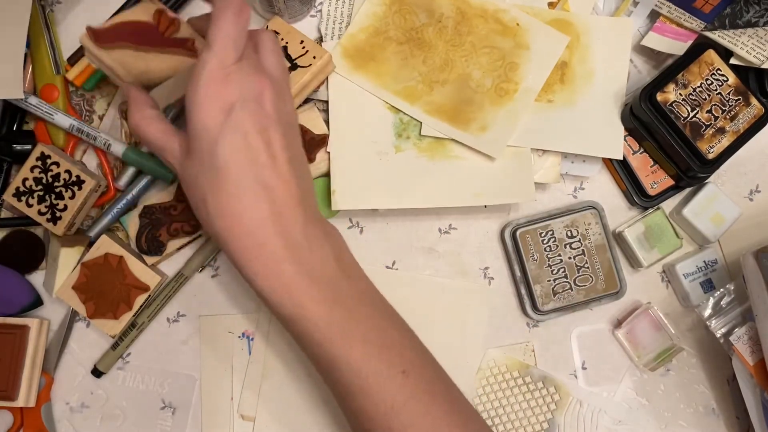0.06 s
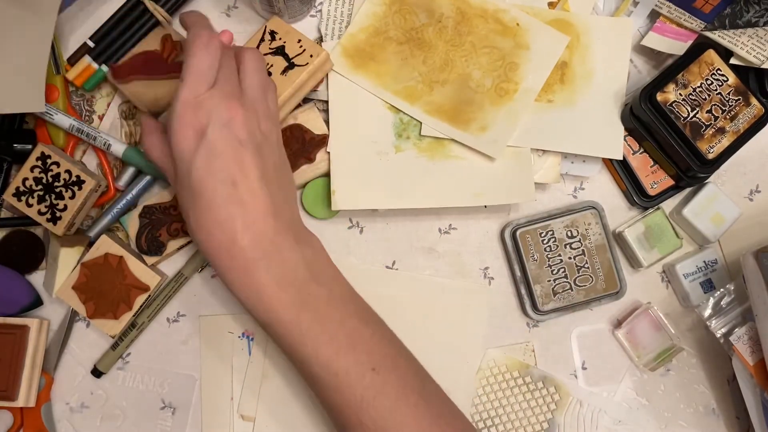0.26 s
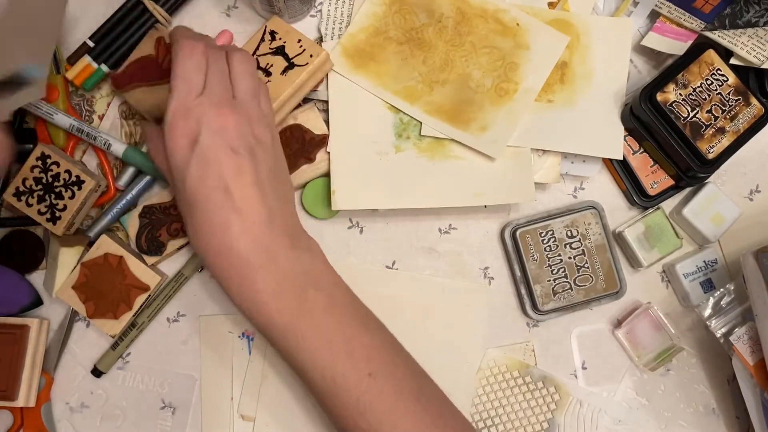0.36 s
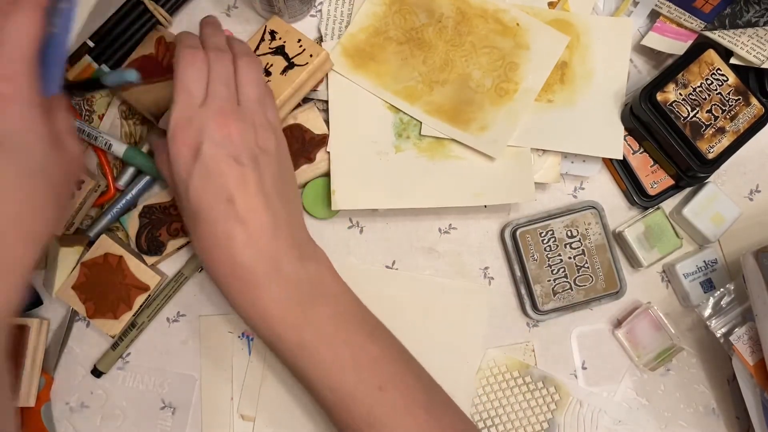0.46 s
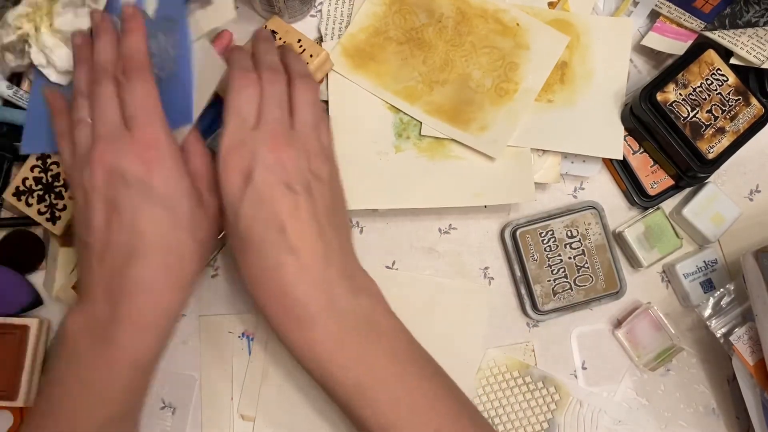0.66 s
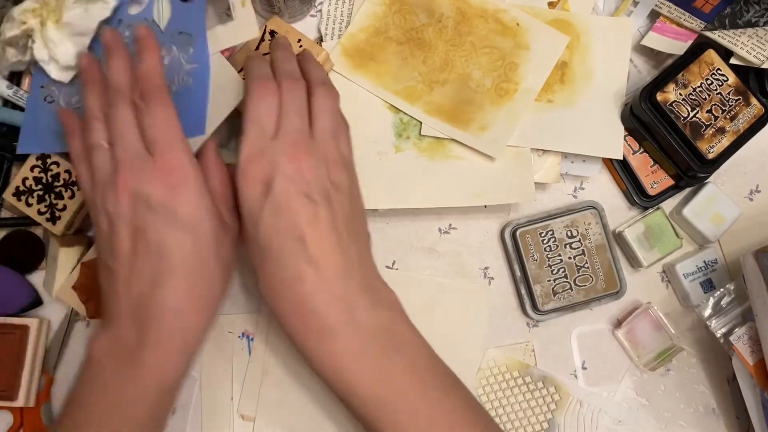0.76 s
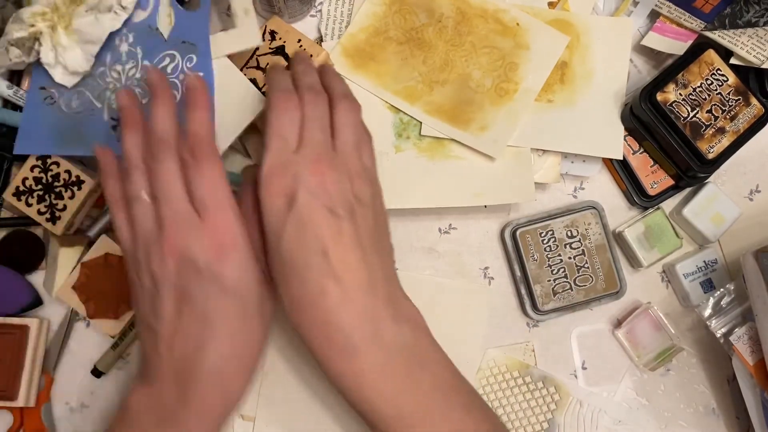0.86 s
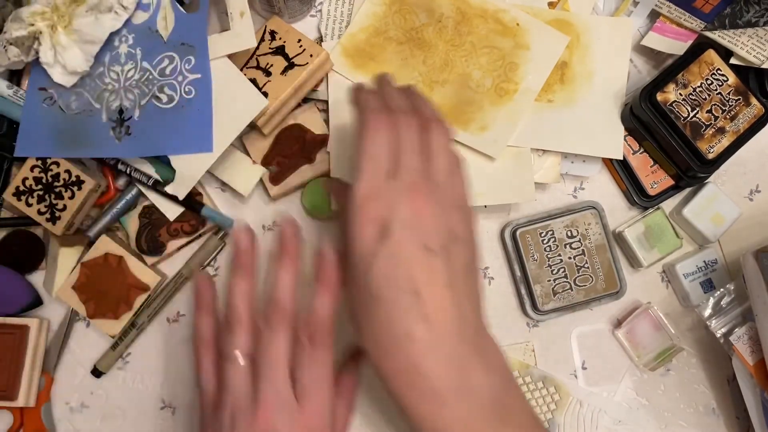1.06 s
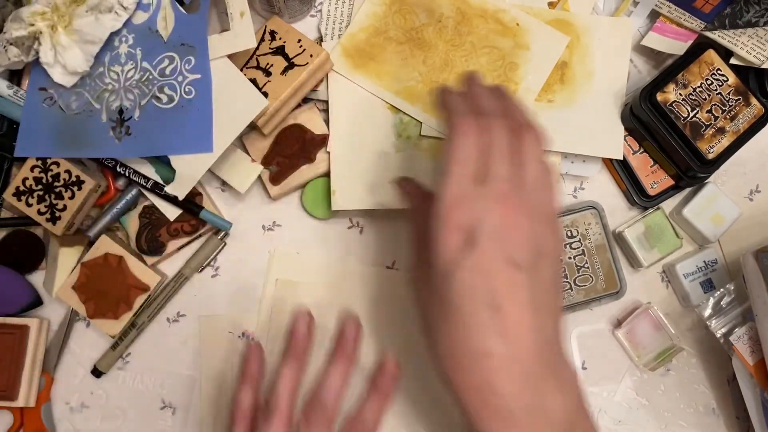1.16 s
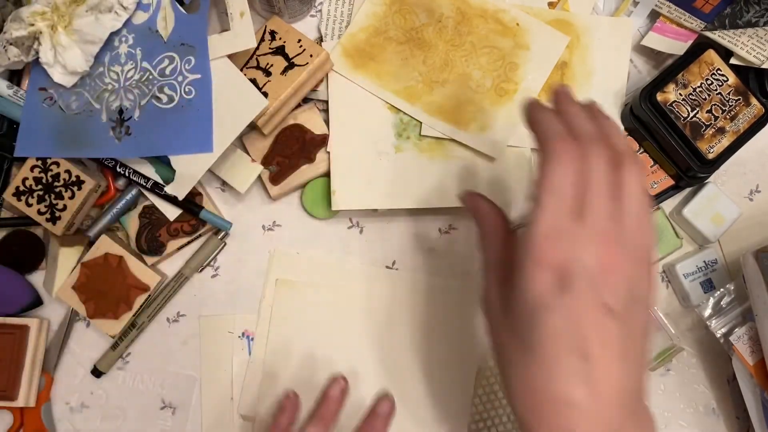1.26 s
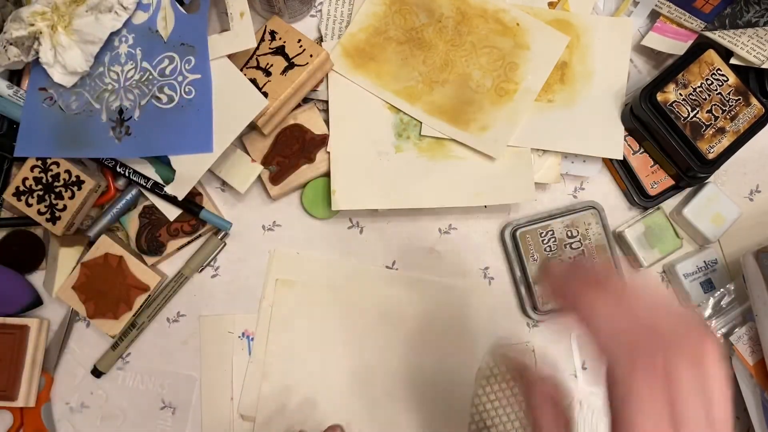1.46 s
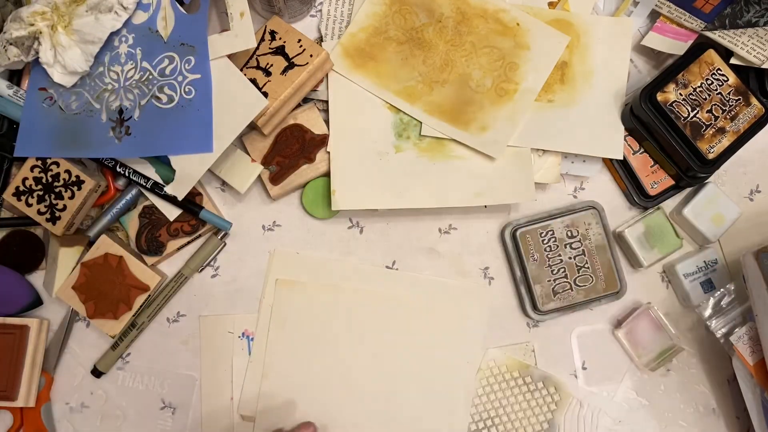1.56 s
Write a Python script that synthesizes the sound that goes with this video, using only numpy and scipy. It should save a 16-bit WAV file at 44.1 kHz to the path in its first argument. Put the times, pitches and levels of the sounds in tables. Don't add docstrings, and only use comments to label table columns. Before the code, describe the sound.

Light wooden knocks, clicks and short skids of craft blocks being shifted, with paper rustling, then quiet.

```python
import sys
import numpy as np
from scipy import signal
from scipy.fft import rfft, irfft
from scipy.io import wavfile
from scipy.ndimage import uniform_filter1d

SR = 44100
rng = np.random.default_rng(int(sys.argv[2]) if len(sys.argv) > 2 else 0)


def nominal_scale(level):
    x = np.asarray(level, float) / 20
    return 10 ** x


def wrap_up_sound(samples):
    columns = np.atleast_2d(samples).T
    tamed = np.clip(columns, -1, 1)
    steps = np.round(tamed * 32767).astype(np.int16)
    wavfile.write(sys.argv[1], SR, steps)


N = 70560

# (frequency [Hz], density [dB per Hz])
ROOM_TONE = [(28, -11), (60, 0.5), (230, -8.5), (480, -14), (650, -24), (2000, -20.5), (3300, -32),
             (15000, -34)]
# (frequency [Hz], likeness [0-1])
ROOM_LIKENESS = [(100, 0.97), (300, 0.89), (520, 0.39), (900, 0.027), (2000, 0.88), (3000, 0.55),
                 (5000, 0.89), (8000, 0.58)]
# (frequency [Hz], likeness [0-1])
NEAR_LIKENESS = [(300, 1), (480, 0.89), (750, 0.75), (2000, 1), (3000, 0.19), (5000, 0.92), (8000, 0.99)]
ROOM_DB = -63

# (time [s], level [dB], low drag weight [dB])
HAND_EFFORT = [(0, -73.5, -4), (0.077, -74, -2), (.14, -60.5, 1), (.2, -65.5, -2), (.25, -81, 1),
               (.3, -60, -4), (0.359, -62, 1), (0.401, -46.5, -36), (.42, -55.5, -4.5), (.495, -55.5, -6.5),
               (.515, -51.5, -0.5), (.62, -51.5, 0.5), (.72, -49.5, -6.5), (.75, -58.5, 6.5),
               (0.8, -51.5, 0.5), (0.838, -60, -8), (1.0, -72, -1.5), (1.25, -95, 21)]
# (frequency [Hz], density [dB per Hz])
RUB_TONE = [(150, -12.5), (520, -3.5), (1700, -5), (2400, -8.5), (3400, -10), (6500, -13.5), (10500, -11),
            (16000, -22.5)]
RUB_DB, DRAG_HZ = 3.5, 2130
GRAINS_PER_S, GRAIN_DB, GRAIN_SPREAD_DB = 450, 0.5, 3.5

# (time [s], level [dB], ring [Hz], t60 [s])
SNAPS = [(.032, -56, 207, 0.043), (.1425, -48.5, 1296, 0.034), (.143, -49, 5240, 0.023),
         (.184, -55, 4300, .01), (.2525, -51, 950, 0.015), (.3115, -46, 1250, 0.01),
         (.330, -46.5, 693, .02), (.3315, -49.5, 1570, 0.035), (.4295, -46, 1520, 0.016),
         (.4895, -42.5, 4050, 0.017), (.4898, -39, 1710, .013), (.512, -45, 694, 0.011),
         (.5165, -43.5, 1510, 0.011), (.5192, -37.5, 512, 0.022), (.523, -45, 900, 0.012),
         (.537, -44.5, 900, .02), (.547, -50, 2140, 0.033), (.555, -46.5, 646, 0.018),
         (.562, -48, 1200, 0.012), (.581, -45, 600, .03), (.589, -43, 800, 0.017), (.611, -48, 1410, .015),
         (.642, -39, 1700, 0.018), (.6555, -34.5, 1650, 0.011), (.673, -41, 700, 0.018),
         (.6975, -37.5, 1400, 0.015), (.7457, -41, 617, 0.02), (.757, -46, 1300, .02),
         (.7645, -45, 5640, .015), (.7775, -43.5, 454, 0.028), (.7888, -31, 1750, .016),
         (.7895, -38.5, 3130, .01), (.796, -48, 5130, 0.011), (.8089, -33, 1215, .01),
         (.8145, -41.5, 5070, .01), (.8212, -44, 3000, .008), (.838, -50, 3120, .012),
         (.8616, -44, 5040, .015), (.993, -53, 226, .05), (1.008, -50.5, 192, .07), (.2985, -38, 700, .03),
         (.229, -36, 1150, .025), (.6245, -35, 800, .02), (.436, -42, 310, .04), (.3925, -46, 2500, 0.013),
         (1.082, -55.5, 2980, 0.014), (1.0825, -53, 1620, 0.013), (.888, -52.5, 1190, 0.017),
         (.83, -53, 523, .04)]
SNAP_RISE_TURNS, SNAP_SAG = 0.31, 0.094

# (time [s], level [dB], pitch [Hz], t60 [s], rise [s])
THUMPS = [(0.099, -59, 249, 0.12, 0.005), (.229, -31.5, 318, 0.043, 0.0044),
          (.233, -29, 170, 0.032, 0.0026), (.254, -30, 133, 0.059, 0.0078),
          (.279, -28.5, 193, 0.047, 0.0029), (.298, -26, 246, 0.068, 0.0039),
          (.3, -18.5, 182, 0.049, 0.0056), (0.331, -29, 193, 0.045, 0.0097),
          (0.341, -32.5, 198, 0.017, 0.0047), (.402, -46, 217, 0.044, 0.003),
          (.430, -33, 181, 0.09, 0.0073), (.433, -37.5, 256, 0.041, 0.0049),
          (0.52, -48, 250, 0.035, 0.0037), (0.583, -43, 150, 0.063, 0.0067),
          (0.6283, -23.5, 175, 0.036, 0.0015), (.652, -48, 248, 0.047, 0.0022),
          (0.769, -34, 154, 0.029, 0.0078), (.235, -39.5, 101.5, 0.13, 0.0085),
          (.301, -37, 104, 0.07, 0.0019), (0.433, -43, 90.7, 0.071, 0.0027),
          (0.6252, -30, 495, 0.013, 0.00079), (0.629, -43.5, 105, 0.11, 0.0064),
          (.308, -32, 320, 0.055, 0.0045)]
# (frequency [Hz], level [dB], t60 [s])
BLOCK_MODES = [(690, -0.5, 0.024), (900, -25, 0.047), (1147, -19.5, 0.031), (398.3, 5, 0.042)]
BLOCK_DB = -22
SETTLE, SETTLE_S = 0.57, 0.0023

# (time [s], level [dB], ring [Hz], length [s], treble share
# [dB])
TICKS = [(0.11, -56.5, 1350, 0.035, 3), (0.139, -45.5, 1200, 0.0091, 2),
         (0.2281, -31.5, 1190, 0.0049, -10.5), (0.231, -33, 690, 0.011, -43),
         (.266, -38.5, 1290, 0.0044, 0.5), (0.276, -41, 1010, 0.0047, -3), (0.297, -34.5, 690, 0.0062, -26),
         (0.331, -48, 1480, 0.012, -10), (0.387, -50, 2500, 0.028, 3), (0.4307, -36.5, 2480, 0.003, 2),
         (0.4895, -45.5, 1900, 0.0068, 8), (.512, -41, 900, 0.023, 2.5), (0.586, -43.5, 600, 0.0063, -10),
         (0.617, -34.5, 900, 0.0068, -11), (0.618, -39.5, 4100, 0.016, 3), (0.654, -40, 1470, 0.011, -3),
         (0.761, -37, 1390, 0.012, -3.5),
    (0.7876, -37.5, 1700, 0.0056, -0.5),
    (0.8084, -36.5, 1180, 0.0052, -2),
    (0.811, -60, 1970, 0.0038, -9),
    (0.836, -58, 3000, 0.0054, -8),
    (0.862, -53, 5100, 0.0049, 3),
    (0.888, -55, 4860, 0.0054, 1),
    (0.961, -58, 1790, 0.0081, -16),
    (1.002, -63.5, 1590, 0.034, -15),
    (1.081, -56, 900, 0.0051, 5.5),
]
# (frequency [Hz], density [dB per Hz])
CRACK_TONE = [(200, -16), (1000, 2), (3000, 6), (6000, 3.5), (11000, -8), (16000, -11)]
TICK_RISE, TICK_Q, TICK_TAIL_S, TICK_TAIL_DB = 0.19, 1.95, 0.029, -20
SPIKY = 1.37

# (time [s], level [dB], pitch [Hz], length [s])
SKIDS = [
    (.6192, -31.5, 1833, 0.0061),
    (.6243, -22, 1320, 0.002),
    (.6885, -34.5, 1420, 0.0088),
    (.7455, -43, 820, 0.0051),
    (.720, -50, 5100, 0.0065),
    (.446, -45.5, 4500, 0.0073),
    (.152, -55, 3850, 0.021),
    (.2284, -39, 2970, 0.004),
]
SKID_WOBBLE = 0.17

ECHO_DB, ECHO_T60_S, ECHO_HZ = -14, 0.21, 3500

# (frequency [Hz], left lead [rad])
PORT_LEAD = [(100, 0), (1900, .1), (3000, 1.2), (5000, .1), (7400, 3.14), (10600, 6.28), (13600, 9.42),
             (16000, 12.5)]
# (frequency [Hz], left minus right [dB])
PORT_PAN = [(100, .1), (400, .6), (800, 2.2), (1600, .2), (3800, -1.5), (6000, 0)]
# (from [Hz], to [Hz])
SUM_GAPS = [(6550, 8150), (12500, 14650)]
# (from [Hz], to [Hz])
DIFFERENCE_GAPS = [(1750, 1950), (5000, 5500), (9700, 11650), (15400, 17000)]
# (from [s], to [s])
BUSY = [(.124, .143), (.227, .234), (.264, .279), (.374, .401), (.428, .433), (.748, .818)]
GAP_DB, RAGGED_HZ = -40, 170
AIR_HZ, AIR_DB, AIR_STEP_HZ, AIR_STEP_DB = 14200, -85, 15150, 9
EDGE_HZ, LOW_CUT_HZ = 15850, 40


def evened(x):
    return x / np.sqrt(np.mean(x ** 2) + 1e-20)


def read(points, hz):
    f, value = np.transpose(points)
    return np.interp(np.log(hz + 1), np.log(f + 1), value)


def add(mix, s, sound):
    part = mix[round(s * SR):][:len(sound)]
    part += sound[:len(part)]


def colour(x, gain):
    hz = np.fft.rfftfreq(x.shape[-1], 1 / SR)
    return irfft(rfft(x) * gain(hz), x.shape[-1])


def hiss(tone, patchy_db):
    a, b, patches = rng.standard_normal((N // 128 + 5, 257, 3)).T
    patches = uniform_filter1d(patches, size=8, axis=0)
    patches = evened(uniform_filter1d(patches, size=10, axis=1))
    grid = (a + 1j * b) * nominal_scale(patchy_db * patches)
    x = signal.istft(grid, nperseg=512, noverlap=384)[1][:N]
    return evened(colour(x, lambda f: nominal_scale(read(tone, f))))


def pair(x, other, likeness):
    def shared(f):
        return np.sqrt((1 + np.clip(read(likeness, f), 0, 1)) / 2)

    unlike = colour(other, lambda f: np.sqrt(1 - shared(f) ** 2 + 1e-12))
    return colour(x, shared) + np.array([unlike, -unlike])


def smear(x, t60, first):
    t = np.arange(round(0.4 * SR)) / SR
    tail = rng.standard_normal(len(t)) * nominal_scale(-60 * t / t60) * (t > first)
    return signal.fftconvolve(x, tail / np.linalg.norm(tail))[:N]


def room():
    left_and_right = pair(hiss(ROOM_TONE, patchy_db=1.2), hiss(ROOM_TONE, patchy_db=1.2), ROOM_LIKENESS)
    return nominal_scale(ROOM_DB) * left_and_right


def rustle():
    at, db, drag_db = np.transpose(HAND_EFFORT)
    t = np.arange(N) / SR
    size = nominal_scale(GRAIN_SPREAD_DB * np.minimum(rng.exponential(1, N), 4))
    size = size * (rng.random(N) < GRAINS_PER_S / SR)
    decay = np.exp(-np.arange(400) / SR / 0.004)
    catches = evened(signal.fftconvolve(size, decay)[:N])
    lift_off = np.clip((at[-1] - t) / 0.18, 0, 1)
    effort = lift_off * nominal_scale(RUB_DB + np.interp(t, at, db))
    shape = effort * evened(1 + nominal_scale(GRAIN_DB) * catches)
    both = pair(hiss(RUB_TONE, patchy_db=3.0), hiss(RUB_TONE, patchy_db=-0.5), NEAR_LIKENESS)
    drag = colour(both, lambda f: 1 / (1 + (f / DRAG_HZ) ** 6))
    return shape * (both - drag + nominal_scale(np.interp(t, at, drag_db)) * drag)


def snaps():
    out, t = np.zeros(N), np.arange(4096) / SR
    for s, db, hz, t60 in SNAPS:
        turns = hz * t * (1 - SNAP_SAG * np.minimum(t / t60, 1))
        ring = np.sin(2 * np.pi * turns) + 0.29 * np.sin(2 * np.pi * 1.25 * turns)
        rise = 1 - np.exp(-t * hz / SNAP_RISE_TURNS)
        add(out, s, nominal_scale(db - 60 * t / t60) * rise * ring)
    return out


def thumps():
    out, t = np.zeros(N), np.arange(round(0.25 * SR)) / SR
    for s, db, hz, t60, rise in THUMPS:
        turns = hz * (t + SETTLE * SETTLE_S * (1 - np.exp(-t / SETTLE_S)))
        swell = 1 - np.exp(-(t / rise) ** 2)
        top = swell * nominal_scale(-60 * t / t60) * np.sin(2 * np.pi * turns)
        f, mode_db, mode_t60 = np.transpose(BLOCK_MODES)[:, :, None]
        f = f * rng.uniform(0.883, 1.034, f.shape)
        modes = nominal_scale(BLOCK_DB + mode_db - 60 * t / mode_t60) * np.sin(2 * np.pi * f * t)
        add(out, s, nominal_scale(db + 5.0) * (top + modes.sum(0)))
    return out


def ticks():
    out, t = np.zeros(N), np.arange(4096) / SR
    for s, db, hz, length, treble_db in TICKS:
        push = rng.standard_normal((2, len(t)))
        u = t / length
        tail = nominal_scale(TICK_TAIL_DB) * np.exp(-t / TICK_TAIL_S)
        shape = np.minimum(u / TICK_RISE, 1) * (np.exp(-u ** 2 * 2) + tail)
        push = np.sign(push) * abs(push) ** SPIKY * shape
        b, a = signal.iirpeak(hz, TICK_Q, SR)
        ring = signal.lfilter(b, a, signal.lfilter(b, a, push[0]))
        crack = evened(colour(np.roll(push[1], 64), lambda f: nominal_scale(read(CRACK_TONE, f))))
        sound = evened(ring) + nominal_scale(treble_db) * np.roll(crack, -64)
        add(out, s, nominal_scale(db - 6) * np.sqrt(np.mean(shape ** 2)) * sound)
    return out


def skids():
    out = np.zeros(N)
    for s, db, hz, length in SKIDS:
        u = np.arange(round(length * SR)) / (length * SR)
        waver = evened(uniform_filter1d(rng.standard_normal(1024), size=40))[:len(u)]
        turns = np.cumsum(hz * (1 + SKID_WOBBLE * waver)) / SR
        add(out, s, nominal_scale(db) * np.sin(np.pi * u ** 0.8) * np.sin(2 * np.pi * turns))
    return out


def scene():
    hits = thumps() + ticks() + skids() + snaps()
    near = pair(hits, smear(hits, 0.018, 0), NEAR_LIKENESS)
    echo = pair(smear(hits, ECHO_T60_S, 0.012), smear(hits, ECHO_T60_S, 0.0059), ROOM_LIKENESS)
    echo = colour(echo, lambda f: 1 / np.sqrt(1 + (f / ECHO_HZ) ** 2))
    return near + nominal_scale(ECHO_DB) * echo + rustle() + room()


def sum_difference_gaps(x):
    sum_and_difference = np.array([x[0] + x[1], x[0] - x[1]]) / 2
    hz, t, z = signal.stft(sum_and_difference, SR, nperseg=512, noverlap=384)
    hz = hz[:, None]
    calm = ~np.any([(t > a) & (t < b) for a, b in BUSY], axis=0)
    wander = np.repeat(rng.standard_normal((len(t) // 8 + 1, 2)), 8, axis=0)[:len(t)].T
    low, high = RAGGED_HZ * wander

    def inside(gaps):
        return np.any([(hz > a + low) & (hz < b + high / 2) for a, b in gaps], axis=0) & calm

    top = hz > AIR_HZ
    air = uniform_filter1d((abs(z[0, top[:, 0]]) ** 2).sum(0), size=8)
    air = air * nominal_scale(wander[1] * 4.7)
    faint = top & (air < nominal_scale(2 * (AIR_DB + AIR_STEP_DB * (hz < AIR_STEP_HZ))))
    drop = np.array([inside(SUM_GAPS) | faint, inside(DIFFERENCE_GAPS)])
    z = z * np.where(drop, nominal_scale(GAP_DB), 1)
    mid, side = signal.istft(z, SR, nperseg=512, noverlap=384)[1][:, :N]
    return np.array([mid + side, mid - side])


def band_limit(x):
    return signal.sosfilt(signal.butter(12, 16460, fs=SR, output="sos"), x)


def record(dry):
    side = np.array([[0.5], [-0.5]])

    def port(f):
        phase_and_level = np.exp(1j * side * read(PORT_LEAD, f)) * nominal_scale(side * read(PORT_PAN, f))
        return phase_and_level * (f < EDGE_HZ) * f ** 2 / (f ** 2 + LOW_CUT_HZ ** 2)

    mix = sum_difference_gaps(colour(dry, port))
    return band_limit(mix)


dry = scene()
out = record(dry)
wrap_up_sound(out)
```